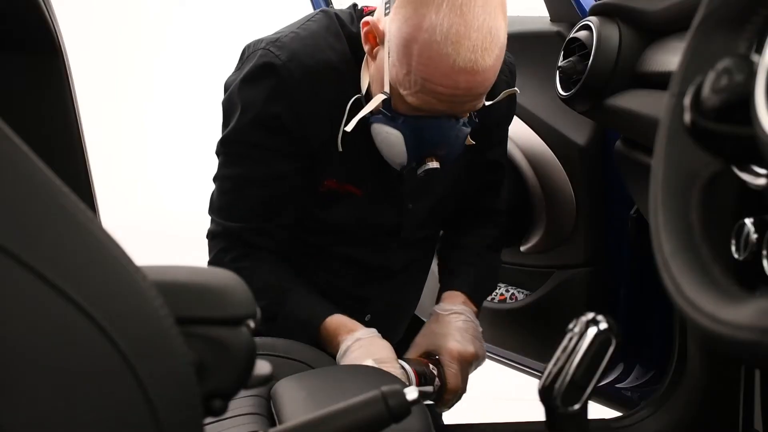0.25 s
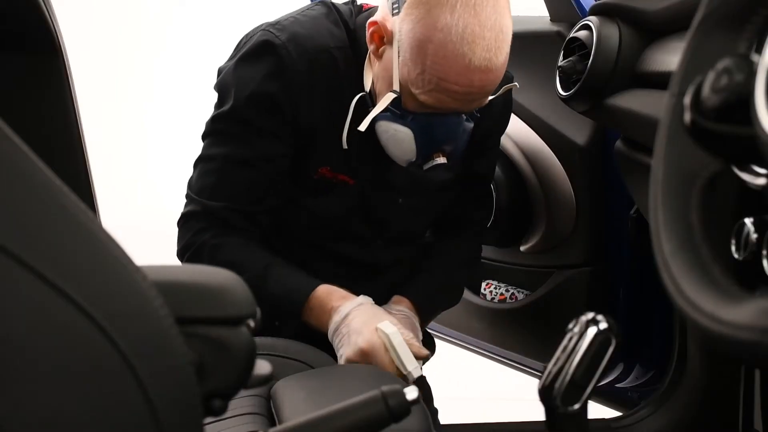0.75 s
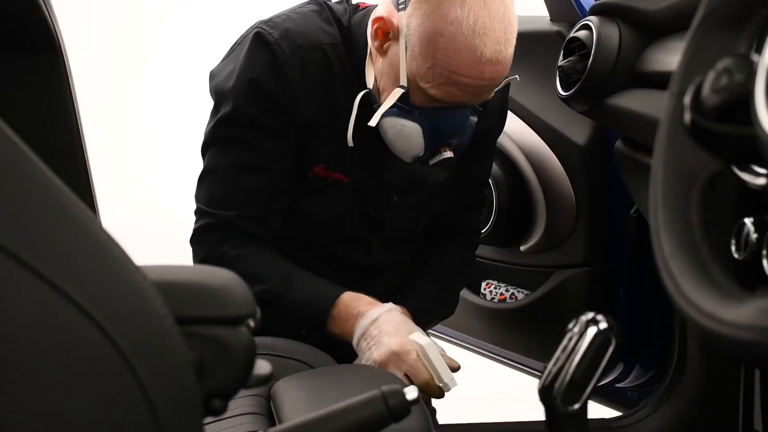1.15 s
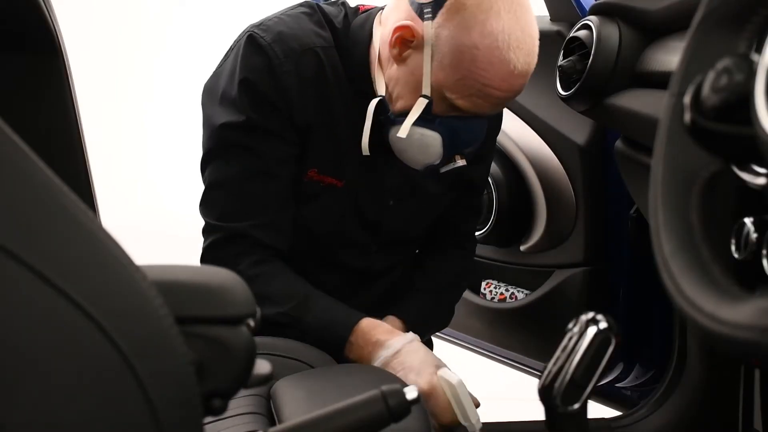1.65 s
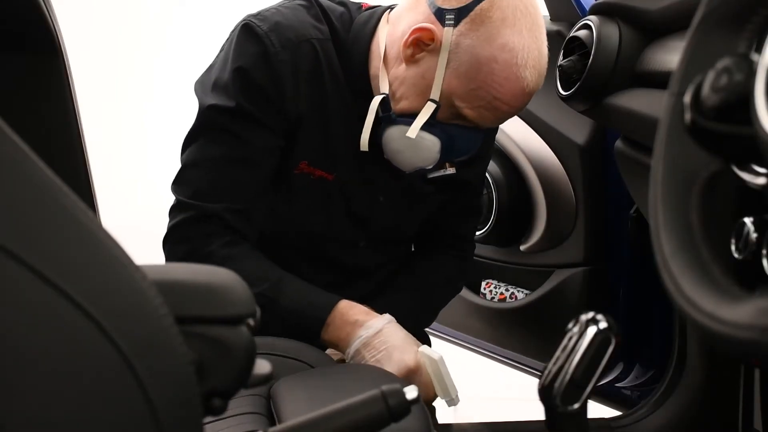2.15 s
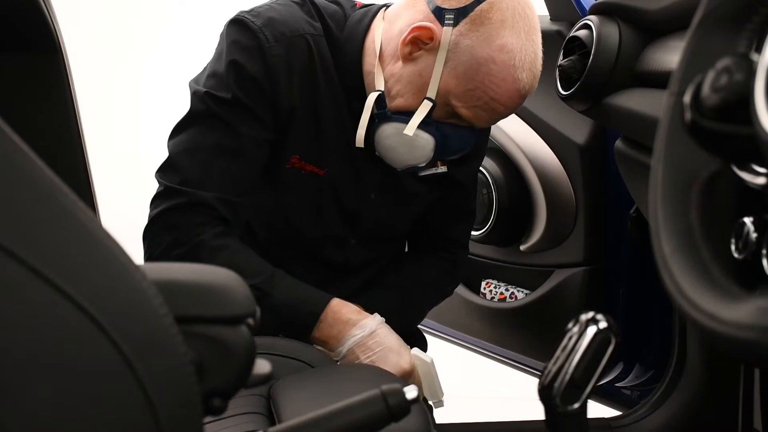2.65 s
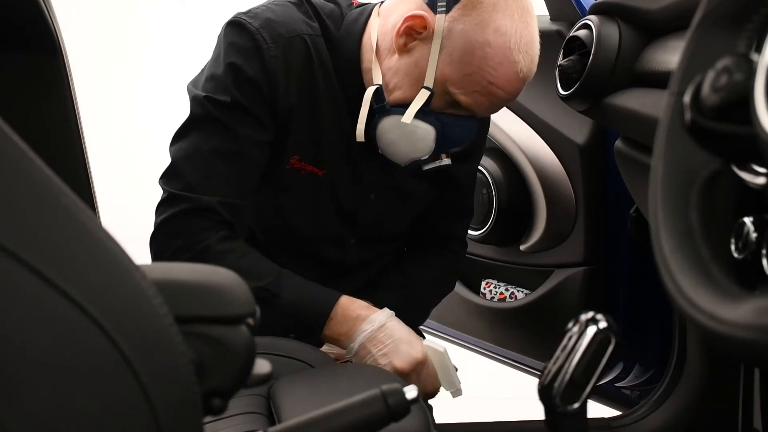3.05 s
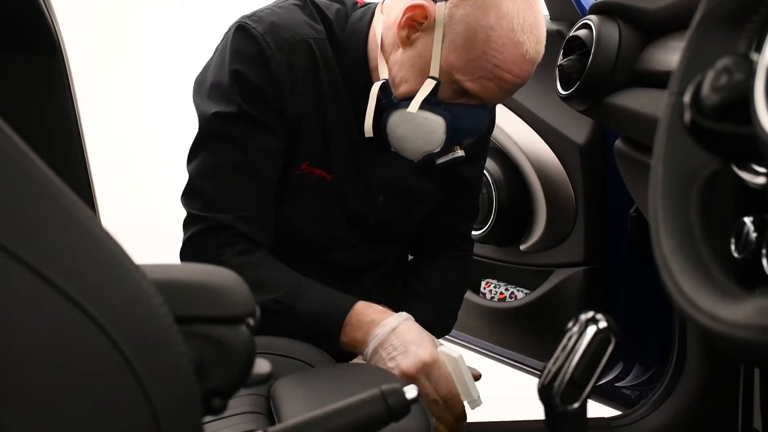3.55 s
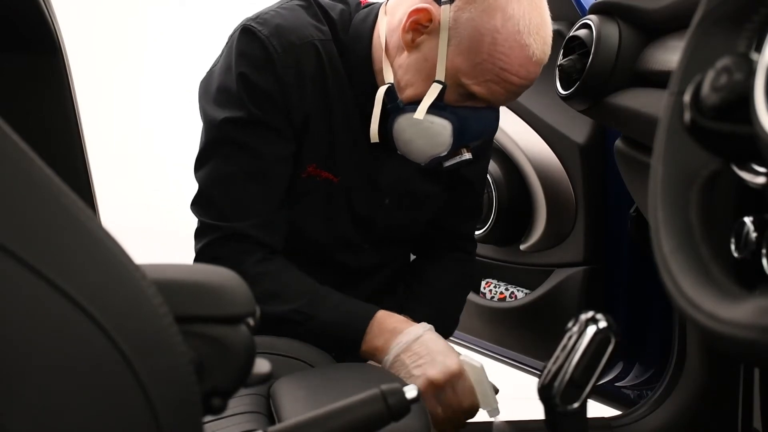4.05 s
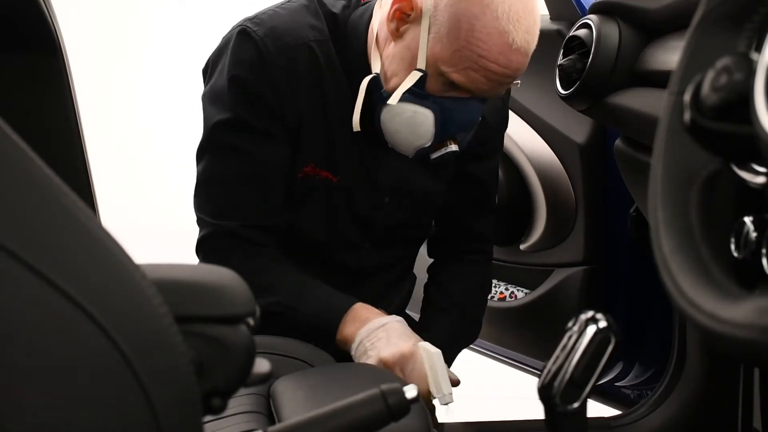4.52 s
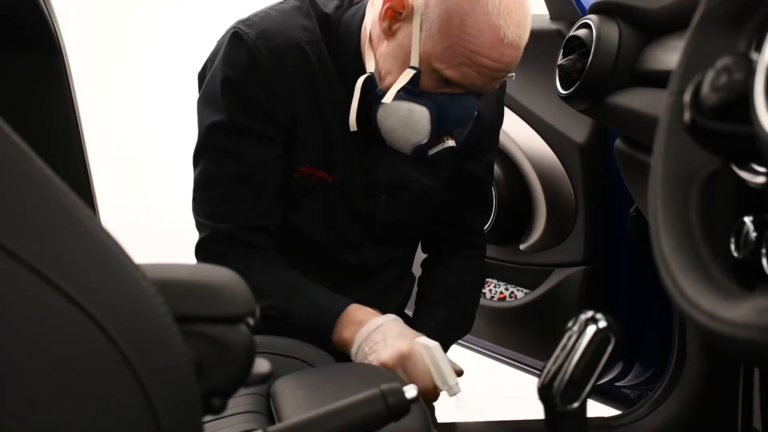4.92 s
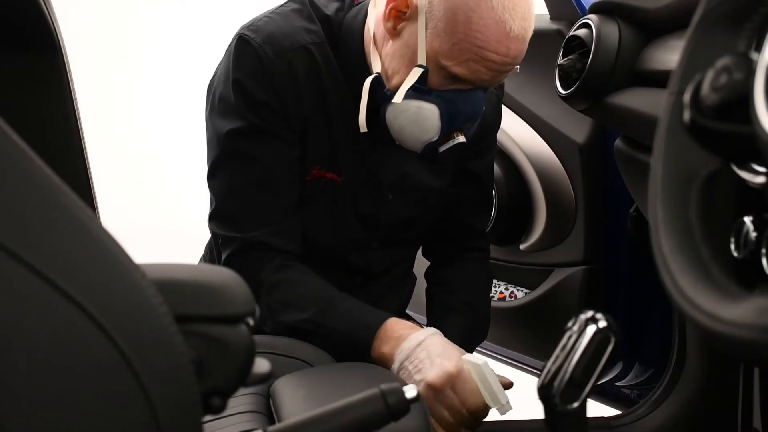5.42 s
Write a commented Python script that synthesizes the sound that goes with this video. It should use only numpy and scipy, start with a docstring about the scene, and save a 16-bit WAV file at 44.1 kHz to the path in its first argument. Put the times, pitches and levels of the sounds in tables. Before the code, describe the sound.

A plastic trigger sprayer is handled, snaps sharply once, then is pumped about every 0.4 seconds, each pull a short misty hiss with clicking returns.

```python
"""A knock, a soft bump and fine rustle come first, then a hard pull of a plastic trigger sprayer.
It is pumped onto upholstery inside an open car in a hall, close to a mono microphone.
Each pull is a noise swell of mist; in some the piston judders in quick spits and knocks.
Between pulls the trigger clicks back (resonated bursts) and draws liquid (grainy noise).
Hard plastic snaps once (decaying sines); liquid whistles now and then; the air is steady noise."""
import sys
import numpy as np
from scipy import signal
from scipy.fft import rfft, irfft, next_fast_len
from scipy.io import wavfile
from scipy.ndimage import map_coordinates

SR = 44100
rng = np.random.default_rng(int(sys.argv[2]) if len(sys.argv) > 2 else 0)


def master_out(mix):
    """Clip the mix to full scale and print it as 16-bit PCM to the path in sys.argv[1]."""
    frames = np.transpose(np.atleast_2d(mix))
    ceiling = np.clip(frames, -1, 1)
    pcm = np.round(ceiling * 32767).astype(np.int16)
    wavfile.write(sys.argv[1], SR, pcm)


N = 250488

# Soft handling bumps: start_s, level_db, nominal pitch_hz (it sags), swell_s
BUMPS = [(0.027, -31.5, 71.3, 0.015), (0.622, -22, 84, 0.0069), (0.893, -29.5, 208, 0.0021),
         (1.134, -39, 90, 0.0084), (1.238, -21.5, 117, 0.0094), (2.513, -28, 151, 0.0035),
         (3.216, -34.5, 180, 0.007), (3.36, -34, 150, 0.0038)]
# Low rumble over time: time_s, level_db before RUMBLE_DB
RUMBLE_LEVEL = [(0.0, -52.5), (0.7, -43), (1.06, -52.5), (1.3, -54), (1.75, -50), (2.26, -62),
                (2.88, -62.5), (3.15, -51), (3.8, -59.5), (4.9, -67), (5.06, -62), (5.68, -67)]
# Sleeve sliding on the seat over time: time_s, level_db before SLIDE_DB
SLIDE_LEVEL = [(0.0, -58), (0.55, -58.5), (0.79, -55), (1.06, -60), (1.75, -56.5), (2.59, -63), (3.57, -61),
               (3.72, -55.5), (4.27, -56), (4.38, -55), (4.52, -77), (4.75, -76), (4.89, -70.5),
               (5.68, -66.5)]
# Fine rustle over time: time_s, level_db before RUSTLE_DB
RUSTLE_LEVEL = [(0.35, -60.5), (0.85, -66.5), (1.57, -58.5), (1.83, -63), (3.36, -62), (3.79, -69),
                (5.68, -68)]
# Brief soft noise swells, among them one at the start, a liquid draw and a wash after the snap:
# centre_s, level_db, half_length_s
SOFT_SWELLS = [(0.033, -53, 0.062), (0.296, -55, 0.036), (0.822, -62.5, 0.02), (1.35, -57, 0.08),
               (1.511, -57, 0.02)]

# Contact levels below are relative: trigger() trims ticks and knocks.
# Bottle knocked as it is picked up and set:
# start_s, knock_db, tick_db over knock, nominal pitch_hz, thunk_db over knock
KNOCKS = [(0.0222, -32, -33, 1450, -14), (0.2994, -23.5, -17, 1216, -7.5), (0.602, -25, -19.5, 1410, -7),
          (0.634, -30.5, -20, 1170, -9), (1.2279, -28.5, -9, 1380, -9.5), (1.354, -41, 9.5, 1270, -14),
          (1.3762, -41, -4, 1440, -14)]
# Trigger takes up its slack before a pull: start_s, knock_db
TAKE_UPS = [(2.0764, -36), (3.632, -35), (4.0321, -32.5), (4.816, -46), (5.2076, -41.5)]
# Piston creaks on gentle pulls: start_s, length_s, first knock_db
CREAKS = [(3.6835, .04, -32), (4.125, .006, -32.5), (4.888, .033, -24), (5.2675, .06, -30),
          (5.6537, .02, -30)]
# Trigger let go and springing back: start_s, tick_db, first_knock_db, travel_s,
# seating_knock_db, draw_db (liquid heard through the pump body)
RELEASES = [(1.5928, -45.5, -31.5, 0.049, -30, -64), (1.9046, -37, -31, 0.039, -29.5, -58),
            (2.3326, -39, -31.5, 0.041, -26, -53), (2.7112, -39.5, -29, 0.041, -25.5, -56),
            (3.0895, -37.5, -39, 0.032, -29, -51), (3.48, -37.5, -41, .0395, -26, -54),
            (3.8808, -39.5, -35.5, 0.042, -32, -54), (4.2687, -37, -43, 0.037, -30, -52),
            (4.673, -34.5, -30.5, 0.024, -37, -55), (5.0648, -35, -37, 0.041, -24.5, -54.5),
            (5.462, -36, -41, 0.048, -35, -53.5)]
# Juddering piston: start_s, length_s, first_gap_s, longest_gap_s, relative strength_db,
# strongest_at (share 0-1 of the length), end_stop_tick_db
JUDDERS = [(.1410, .11, .0087, .0151, 0, .7, -46), (2.0943, .117, .0087, .018, .8, .72, -24.5),
           (2.4832, .126, .0121, .0157, -.5, .5, -27.5), (2.8634, .135, .0111, .0152, .5, .36, -33),
           (3.2366, .133, .0085, .0175, 1.5, .62, -32)]
# Trigger pulls: fullest_flow_s, mist_db, relative pump_body_db, half_length_s, squareness of the swell
PULLS = [(0.206, -40.5, -48.5, .062, 10), (1.713, -46, -46.5, 0.064, 1.64),
         (2.156, -43.5, -43.5, 0.077, 4.5), (2.55, -42.5, -39, 0.054, 3.2), (2.932, -43, -41.5, .055, 2.4),
         (3.312, -43.5, -40.5, 0.07, 2.6), (3.708, -45, -49.5, .065, 3.8), (4.113, -46, -52, 0.066, 2.6),
         (4.501, -46.5, -52, 0.061, 3.2), (4.911, -45, -50, 0.06, 3.2), (5.3, -45, -52, 0.057, 2.7),
         (5.675, -48, -44, 0.061, 1.9)]
# Hard snap and its duller rebound: start_s, ring_db, crack_db, brightness_hz
SNAPS = [(1.2922, -16.5, -13, 12050), (1.2978, -19, -25, 2260)]
# Ring of the snapping plastic: pitch_hz, relative level_db, t60_s (capped in snap())
SNAP_MODES = [(661, -9.5, 0.031), (1150, -19, 0.019), (1448, 6, 0.031), (1616, -11.5, 0.041),
              (2065, -29, .025), (2420, -21, .025), (3710, -26.5, .03), (4300, -13, .03),
              (4520, -16, 0.048), (6870, -9.5, .03), (7930, -22, .03), (9000, -7.5, 0.038),
              (11900, -22, .025)]
# Liquid whistling through the valve: centre_s, mean pitch_hz, level_db, half_length_s
WHISTLES = [(2.118, 3290, -39, 0.019), (2.769, 3520, -57.5, 0.013), (5.108, 3400, -53, 0.026)]

# Relative spectra, all with columns: frequency_hz, level_db per Hz
# low rumble of the handling
RUMBLE_SPECTRUM = [(12, -30), (25, -9), (40, -2), (65, 0), (110, -3), (170, -10), (250, -17), (500, -24),
                   (1500, -50), (4000, -85)]
# sleeve on the seat
SLIDE_SPECTRUM = [(100, -14.5), (270, -8.5), (380, 3), (520, 0), (750, -3.5), (1100, -9), (1500, -12),
                  (2200, -32), (5000, -41.5)]
# fine rustle and soft swells, also the scrape of the refill
RUSTLE_SPECTRUM = [(200, 3), (1000, 6), (1500, 8.5), (2300, -1.5), (4000, -0.5), (6000, -2.5),
                   (10000, -5.5), (12500, -20.5), (16000, -37.5)]
# bright tick of meeting plastic
CLACK_SPECTRUM = [(100, -4), (400, -10.5), (1000, -1.5), (2100, 0.5), (2700, -4), (3700, 6.5), (5200, 2),
                  (6500, 4.5), (8000, 7), (10000, 1.5), (11500, -12), (15500, -28.5)]
# dull thunk of the trigger housing
THUNK_SPECTRUM = [(100, 0), (400, -5), (800, 1), (1050, 0.5), (1500, 10), (2000, -5.5), (2800, -15.5),
                  (4500, -22.5), (12000, -49)]
# spit of the nozzle
SPIT_SPECTRUM = [(100, 0), (400, 2), (1000, -12.5), (2000, 2.5), (2700, -6.5), (3700, 1), (5200, -3),
                 (6500, 4.5), (8000, 3.5), (9800, 2), (11500, -6.5), (15500, -15)]
# hiss of the droplets
MIST_SPECTRUM = [(150, 1.5), (500, -2.5), (1000, -2), (2200, -5.5), (2700, -8.5), (4000, -4.5), (5000, -8),
                 (6500, -3.5), (8000, -4.5), (10000, -4), (11500, -9), (15500, -18)]
# crack of the snap
CRACK_SPECTRUM = [(150, 3.5), (400, -8.5), (700, -6.5), (1500, 8), (2600, -1.5), (4000, -2), (5500, -3.5),
                  (6400, 1.5), (9400, -3), (11500, -5), (13500, -15.5), (16000, -34)]
# still air
AIR_SPECTRUM = [(20, -9), (50, 9), (100, -3), (200, -3), (320, -7), (520, -1), (750, -3), (1400, -5),
                (2000, -18), (5000, -25), (11000, -26), (13000, -38), (16000, -50)]

# Hollow plastic of pump and bottle: pitch_hz, width_hz, relative level_db
BODY_MODES = [(724, 180, -11), (1260, 55, 2.5), (1427, 62, 6), (1687, 71, -9), (1750, 200, -19),
              (2290, 66, -7)]
# Decay of the hall around the car: frequency_hz, t60_s
HALL_DECAY = [(100, 0.28), (1500, 0.76), (5000, 0.17), (14000, 0.52)]

TIME = np.arange(N) / SR
HIT = TIME[:SR // 8]  # time within one hit, s
TOP_HZ = 16050  # middle of the recorder's upper band edge
RUMBLE_DB, SLIDE_DB, RUSTLE_DB, AIR_DB = 2, -1, -1.5, -70.5

KNOCK_HZ = 1450  # contact pitch at which the body keeps its own tuning
PITCH_SCATTER = 0.027  # no two contacts ring quite alike
THUNK_DB = -11.5  # housing thunk over each knock
TAKE_UP_TICK_DB = 1.5  # over the knock
CREAK_GAP_S, CREAK_FADE_DB_PER_S, CREAK_TICK_DB, CREAK_HZ = .0135, 70, -16, 1220
STOP_GAP_S, STOP_KNOCK_DB = .021, -6.5  # end stop: delay after the last slip, knock over its tick
LET_GO_HZ = 1482  # knock as the finger lets go
# Inlet valve opens: delay, level over the seating knock, tick over its own knock, pitch
VALVE_S, VALVE_DB, VALVE_TICK_DB, VALVE_HZ = .025, -7.5, -14.5, 1440
SEAT_TICK_DB, SEAT_THUNK_DB, SEAT_HZ = -26, -9.5, 1495  # piston seats: tick and thunk over knock

SHUDDER_DB = -11  # low shaking of the bottle, over the pump body
CRACK_ATTACK_S = 0.00043  # rise of the snap's crack
DRAW_S, DRAW_SAG, DRAW_FADE_S = 0.061, 0.36, 0.035  # liquid draw: length, share left then, fade


def amp(db):
    """Decibels to gain."""
    return 10 ** (np.asarray(db) / 20)


def unit(x):
    """Scale to rms 1."""
    return x / np.sqrt(np.mean(x ** 2) + 1e-20)


def along(points, hz):
    """Read (Hz, value) points along a log frequency axis."""
    f, v = np.transpose(points)
    return np.interp(np.log(hz + 1), np.log(f + 1), v)


def level(points):
    """Gain per sample from (s, dB) points."""
    return amp(np.interp(TIME, *np.transpose(points)))


def add(track, s, sound):
    """Mix a sound in at time s."""
    part = track[max(round(s * SR), 0):][:len(sound)]
    part += sound[:len(part)]


def filtered(x, response):
    """Pass x through a frequency response, scaled so that white noise keeps its power."""
    m = 2 * next_fast_len(len(x) // 2 + SR // 8)
    h = response(np.fft.rfftfreq(m, 1 / SR))
    gain = np.sqrt(np.mean(np.abs(h) ** 2))
    return irfft(rfft(x, m) * h / gain, m)[:len(x)]


def colour(points):
    """Causal (minimum-phase) response with the given spectrum, by folding its cepstrum."""
    def response(hz):
        cepstrum = irfft(np.log(amp(along(points, hz))))
        half = len(cepstrum) // 2
        folded = np.r_[cepstrum[0], 2 * cepstrum[1:half]]
        return np.exp(rfft(folded, len(cepstrum)))
    return response


def body(hz):
    """Resonances of pump and bottle, alternating in sign; they pass little treble."""
    modes = 0
    for k, (centre, width, db) in enumerate(BODY_MODES):
        resonance = 1j * hz * width / (centre * centre - hz * hz + 1j * hz * width)
        modes = modes + (-1) ** k * amp(db) * resonance
    return modes / (1 + 1j * hz / 3000)


def wobble(rate):
    """A smooth random curve, rate knots a second."""
    knots = rng.standard_normal(int(N * rate / SR) + 4)
    return map_coordinates(knots, [TIME * rate])


def grainy(response, rate, depth_db):
    """Noise of rms 1, clumped into grains and then coloured."""
    clumped = rng.standard_normal(N) * amp(depth_db * wobble(rate))
    return unit(filtered(clumped, response))


def burst(t60, tail_db, tail_t60):
    """A sharp crack of noise and its quick scatter around the cabin."""
    crack = amp(-60 * HIT / t60)
    scatter = amp(tail_db - 60 * HIT / tail_t60)
    return rng.standard_normal(len(HIT)) * (crack + scatter)


def blow(scatter_db, t60):
    """A single push on the pump body, followed by a brief rattle."""
    push = amp(scatter_db - 60 * HIT / t60) * rng.standard_normal(len(HIT))
    push[0] += np.sqrt(SR / 500)
    return push


def rumble():
    """Arms and bottle move close by: a lumpy low rumble."""
    lumps = grainy(colour(RUMBLE_SPECTRUM), rate=22, depth_db=2.5)
    return amp(RUMBLE_DB) * level(RUMBLE_LEVEL) * lumps


def sliding_sleeve():
    """A sleeve slides on the seat: slowly clumped, mostly low-mid friction noise."""
    friction = grainy(colour(SLIDE_SPECTRUM), rate=34, depth_db=2.5)
    return amp(SLIDE_DB) * level(SLIDE_LEVEL) * friction


def still_air():
    """Steady coloured noise of the still air."""
    return amp(AIR_DB) * unit(filtered(rng.standard_normal(N), colour(AIR_SPECTRUM)))


def rustle_and_swells():
    """A fine rustle and brief soft swells, shaped from one grainy noise."""
    swells = sum(amp(db) * np.exp(-((TIME - s) / half) ** 4) for s, db, half in SOFT_SWELLS)
    gain = amp(RUSTLE_DB) * level(RUSTLE_LEVEL) + swells
    return gain * grainy(colour(RUSTLE_SPECTRUM), rate=130, depth_db=2.5)


def handling_bumps():
    """Dull bumps of the handling: swelling sines that sag in pitch."""
    bumps = np.zeros(N)
    for s, db, hz, swell in BUMPS:
        u = HIT / swell
        envelope = (u * np.exp(1 - u)) ** 2
        pitch = hz * (0.3 + 0.96 * np.exp(-HIT / 0.012))
        add(bumps, s, amp(db) * envelope * np.sin(2 * np.pi * np.cumsum(pitch) / SR))
    return bumps


def slip_times(length, first, longest):
    """Times of a judder's slips: each gap grows by 1.5 ms, up to a limit."""
    gaps = np.minimum(first + .0015 * np.arange(16), longest)
    slips = np.r_[0, np.cumsum(gaps)]
    return slips[slips < length]


def contacts():
    """Every meeting of plastic parts, as (s, knock dB, tick dB over it, pitch Hz, thunk dB over it)."""
    rows = list(KNOCKS)
    for s, db in TAKE_UPS:
        rows.append((s, db, TAKE_UP_TICK_DB, KNOCK_HZ, THUNK_DB))
    for s, length, db in CREAKS:
        for t in np.arange(0, length, CREAK_GAP_S):
            rows.append((s + t, db - CREAK_FADE_DB_PER_S * t, CREAK_TICK_DB, CREAK_HZ, THUNK_DB))
    for s, length, first, longest, _, _, tick_db in JUDDERS:
        stop = s + slip_times(length, first, longest)[-1] + STOP_GAP_S
        rows.append((stop, tick_db + STOP_KNOCK_DB, -STOP_KNOCK_DB, KNOCK_HZ, THUNK_DB))
    for s, tick_db, first_db, travel, seat_db, _ in RELEASES:
        rows += [(s, first_db, tick_db - first_db, LET_GO_HZ, THUNK_DB),
                 (s + VALVE_S, seat_db + VALVE_DB, VALVE_TICK_DB, VALVE_HZ, THUNK_DB),
                 (s + travel, seat_db, SEAT_TICK_DB, SEAT_HZ, SEAT_THUNK_DB)]
    return rows


def trigger():
    """Plastic parts meet: a bright tick, a dull thunk, and a hollow knock pitched by the contact point."""
    ticks, knocks = np.zeros(N), np.zeros(N)
    housing = colour(THUNK_SPECTRUM)
    for s, db, tick_db, pitch, thunk_db in contacts():
        scattered = pitch / KNOCK_HZ * (1 + PITCH_SCATTER * rng.standard_normal())
        stretch = np.clip(scattered, .8, 1.25) ** .8  # retunes all body resonances
        add(ticks, s, amp(db + tick_db - 4.0) * burst(t60=0.0063, tail_db=-8, tail_t60=0.08))
        push = amp(db - 8.0) * blow(scatter_db=-11.5, t60=0.075)
        add(knocks, s, filtered(push, lambda hz: body(hz / stretch)))
        thunk = filtered(burst(t60=0.013, tail_db=-10, tail_t60=0.081), housing)
        add(knocks, s, amp(db + thunk_db) * thunk)
    return filtered(ticks, colour(CLACK_SPECTRUM)) + knocks


def spit():
    """One spit of the nozzle: a noise burst with a softened onset."""
    return (1 - np.exp(-HIT / .0005)) * burst(t60=.013, tail_db=-15, tail_t60=.042)


def judder():
    """The piston sticks and slips at widening gaps; every slip spits and knocks much like the last."""
    spits, knocks = np.zeros(N), np.zeros(N)
    for s, length, first, longest, db, strongest, _ in JUDDERS:
        shape = spit()  # shared by all slips of this judder
        for t in slip_times(length, first, longest):
            force = amp(db - 20.4 * (t / length - strongest) ** 2 + rng.normal(0, 0.27))
            add(spits, s + t, force * amp(-23.0) * (shape + spit()) / np.sqrt(2))
            add(knocks, s + t, force * amp(-35.5) * blow(scatter_db=-9, t60=0.028))
    return filtered(spits, colour(SPIT_SPECTRUM)) + filtered(knocks, body)


def cabin(x, echo_db, sway_s, count=7):
    """Close trim panels reflect the sprayer; their delays drift as the hand moves."""
    out = x.copy()
    for delay in rng.uniform(.0008, .006, count):
        lag = np.round(SR * (delay + sway_s * wobble(2))).astype(int)
        out += amp(echo_db) * x[np.clip(np.arange(N) - lag, 0, N - 1)]
    return out / np.sqrt(1 + count * amp(echo_db) ** 2)


def mist():
    """Flow swells and ebbs with each pull: droplets hiss, the pump body resounds, the bottle shudders."""
    spray, pump = np.zeros(N), np.zeros(N)
    for s, db, body_db, half, square in PULLS:
        u = np.abs(TIME - s) / half
        jet = np.exp(-u ** square)
        droplets = amp(-30.0) * np.exp(-(u / 0.67) ** 2)  # fine droplets around the jet
        spray += amp(db) * (jet + droplets)
        pump += amp(body_db - 1.5) * (jet + droplets)
    hiss = spray * grainy(colour(MIST_SPECTRUM), rate=900, depth_db=3.0)
    hiss = cabin(hiss, echo_db=-12.0, sway_s=.0001)
    shudder = amp(SHUDDER_DB) * unit(filtered(rng.standard_normal(N), colour(RUMBLE_SPECTRUM)))
    return hiss + pump * (grainy(body, rate=200, depth_db=5.0) + shudder)


def snap():
    """Hard plastic snaps home and rebounds, its modes ringing briefly with a noisy crack."""
    rings, cracks = np.zeros(N), np.zeros(N)
    hz, db, t60 = np.transpose(SNAP_MODES)[:, :, None]
    t60 = np.minimum(t60, .045)
    for s, ring_db, crack_db, bright_hz in SNAPS:
        modes = amp(db - 60 * HIT / t60) * np.sin(2 * np.pi * hz * HIT)
        modes = modes / (1 + (hz / bright_hz) ** 2)
        add(rings, s, amp(ring_db) * modes.sum(0) * (1 - np.exp(-HIT / 0.00048)))
        attack = 1 - np.exp(-HIT / CRACK_ATTACK_S)
        add(cracks, s, amp(crack_db) * attack * burst(t60=.018, tail_db=-8.5, tail_t60=0.063))
    return rings + filtered(cracks, colour(CRACK_SPECTRUM))


def refill():
    """The returning piston scrapes and sucks liquid through the valve: two layers of grainy noise."""
    draw = np.zeros(N)
    for s, *_, db in RELEASES:
        draw += amp(db) * np.interp(TIME - s, [0, .003, DRAW_S, DRAW_S + DRAW_FADE_S],
                                    [0, 1, DRAW_SAG, 0])
    hollow = grainy(body, rate=120, depth_db=12.0)
    scrape = amp(2.5) * grainy(colour(RUSTLE_SPECTRUM), rate=220, depth_db=4.5)
    return draw * (hollow + scrape)


def whistle():
    """Liquid squeezed through the valve sings briefly on a wavering pitch."""
    out = np.zeros(N)
    for s, hz, db, half in WHISTLES:
        phase = 2 * np.pi * np.cumsum(hz * (1 + 0.04 * wobble(500))) / SR
        out += amp(db) * np.exp(-((TIME - s) / half) ** 2) * np.sin(phase)
    return out


def hall(x):
    """The hall around the open car answers: noise decaying at its own rate in each band."""
    hz, t, z = signal.stft(rng.standard_normal(SR), SR, nperseg=256)
    decay = amp(-60 * t / along(HALL_DECAY, hz)[:, None])
    tail = signal.istft(z * decay, SR, nperseg=256)[1]
    return signal.fftconvolve(x, tail / np.linalg.norm(tail))[:N]


def scene():
    """Sprayer with its faint hall, close handling and still air, the same in both channels."""
    sprayer = mist() + judder() + trigger() + refill() + whistle() + snap()
    close_noises = handling_bumps() + rumble() + sliding_sleeve() + rustle_and_swells()
    mono = sprayer + amp(-24.0) * hall(sprayer) + close_noises + still_air()
    return np.array([mono, mono])


def record(dry):
    """The recorder's band ends in a 400 Hz wide slope around TOP_HZ."""
    m = next_fast_len(N + SR // 4)
    lowpass = np.clip((TOP_HZ - np.fft.rfftfreq(m, 1 / SR)) / 400 + .5, 0, 1)
    return irfft(rfft(dry, m) * lowpass, m)[:, :N]


dry = scene()
out = record(dry)
master_out(out)
```